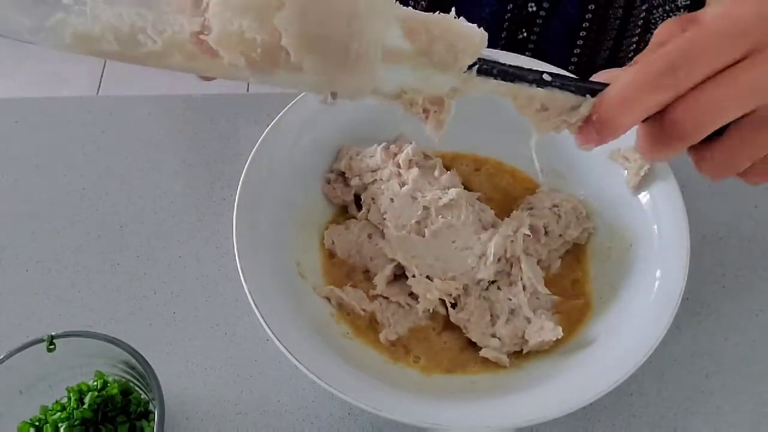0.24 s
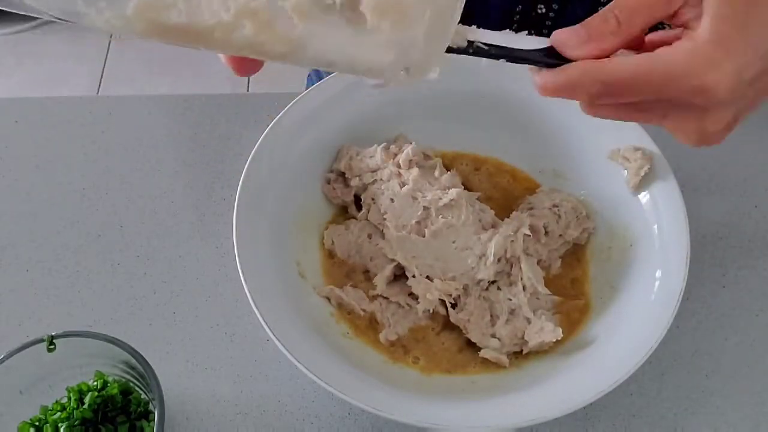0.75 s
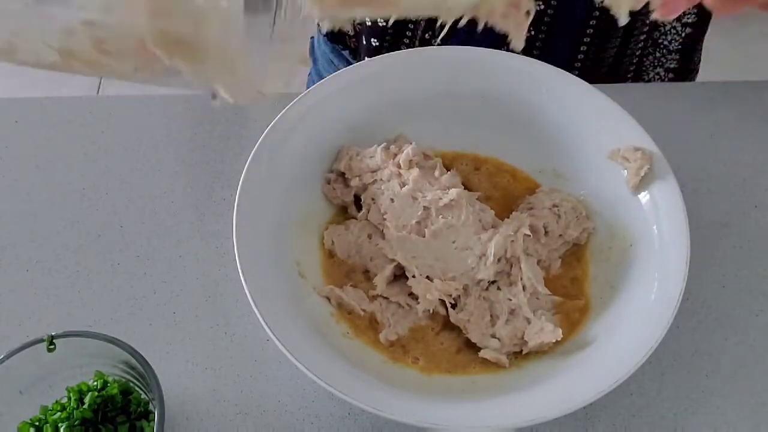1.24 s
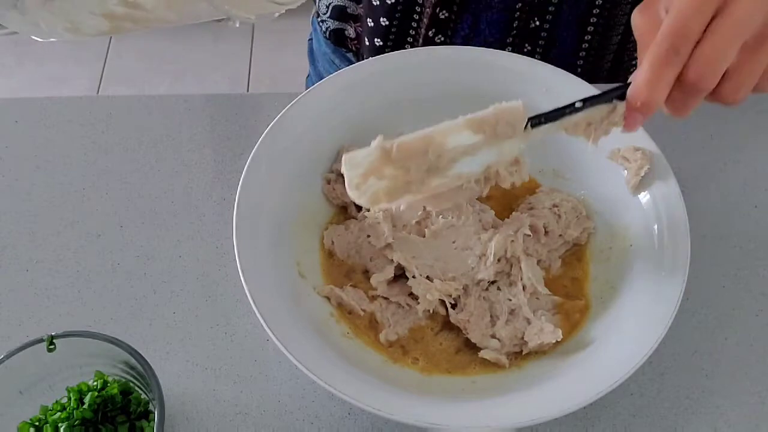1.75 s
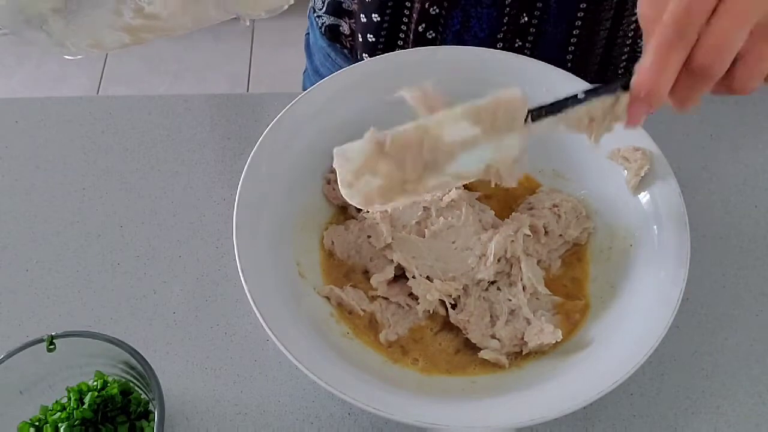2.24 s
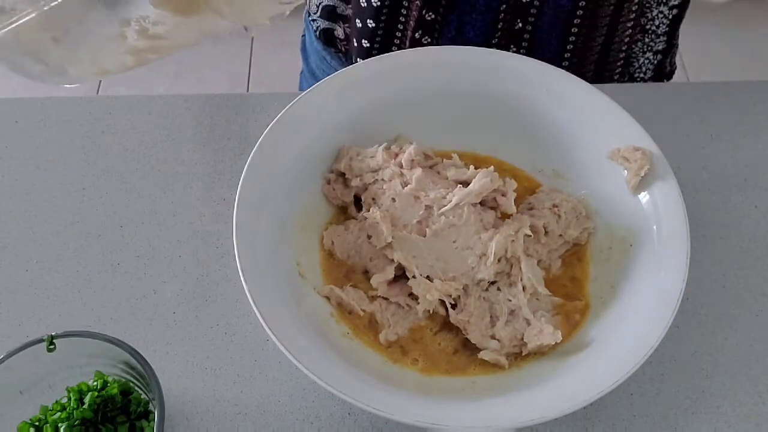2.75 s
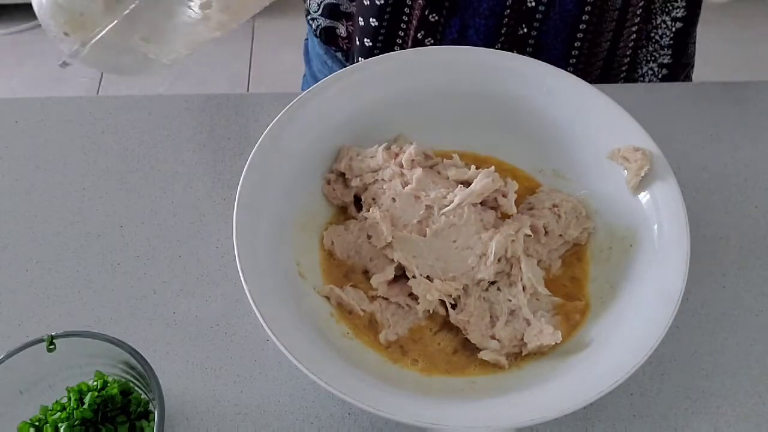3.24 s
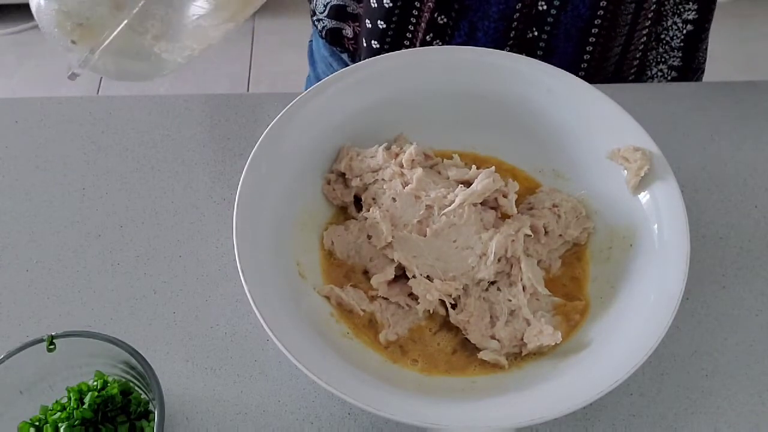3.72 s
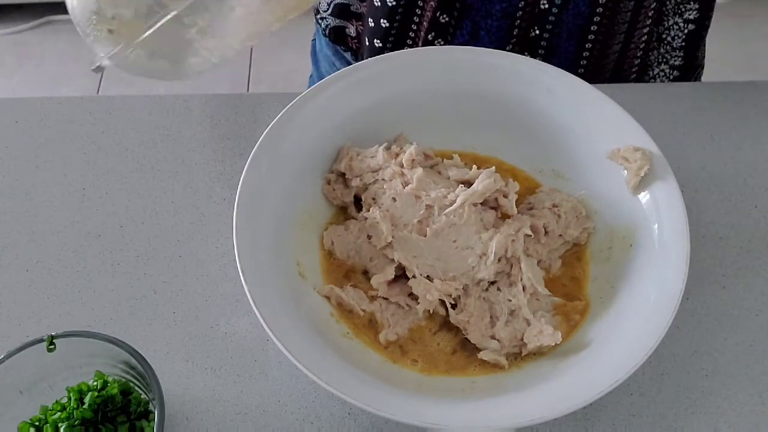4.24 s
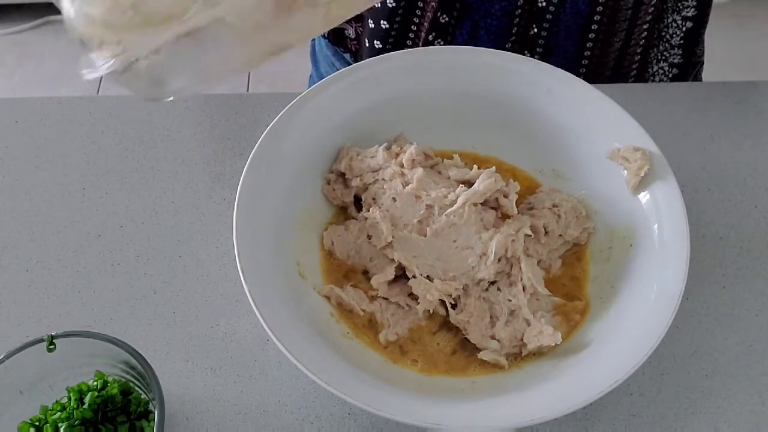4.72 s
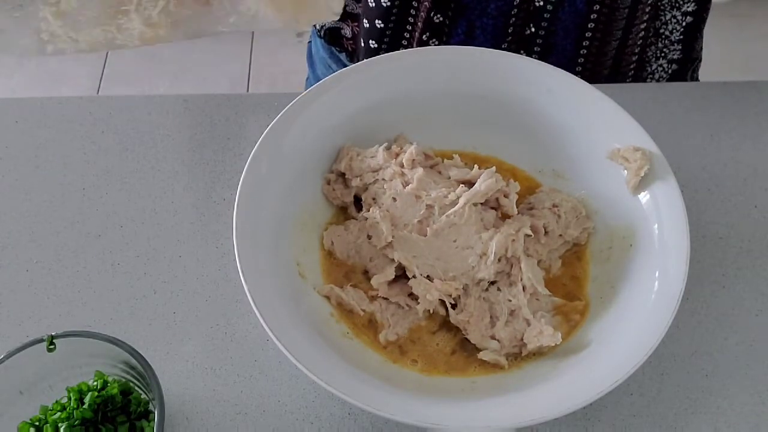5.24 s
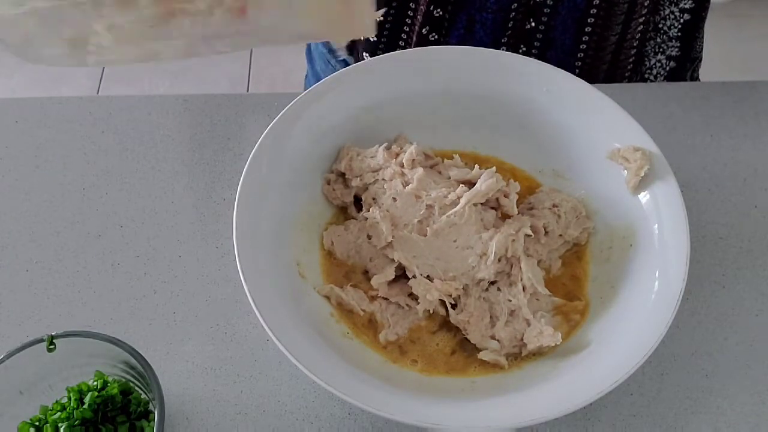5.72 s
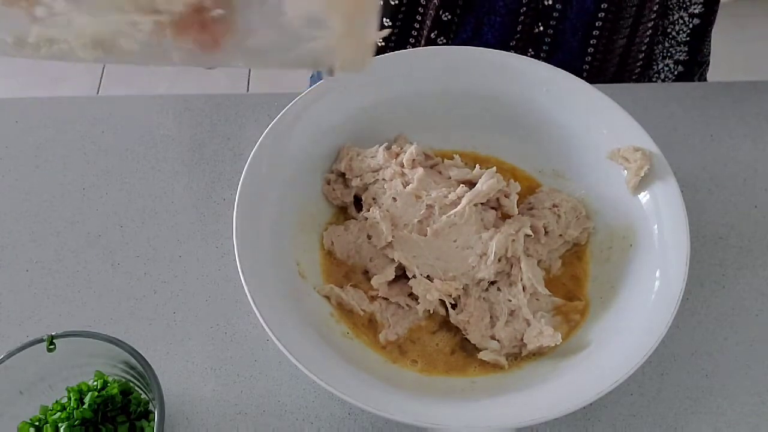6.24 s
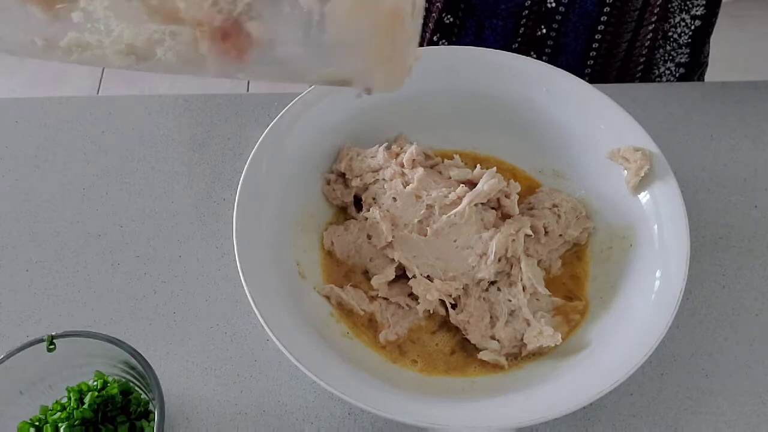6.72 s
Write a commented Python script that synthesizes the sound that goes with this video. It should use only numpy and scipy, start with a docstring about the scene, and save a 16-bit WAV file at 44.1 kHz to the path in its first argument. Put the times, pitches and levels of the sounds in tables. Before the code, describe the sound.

Wet, sticky scraping comes in clusters over a continuous wavering motor hum and soft air noise. A sharp knock on paste-coated glass lands early, another around 0.9 seconds with a dull thud. The middle is sparse, with faint squelches and a bright smacking cluster; then strokes, a strong knock and low bumps follow until the end. The stereo pickup is close, in a small room with a short, slightly hard reverberation.

```python
"""A refrigerator and a slower fan motor hum steadily: wavering harmonics over shaped noise.
A spatula scrapes thick paste out of a glass blender jug into a bowl, in a small kitchen.
Scraping is clumped pops and grains through resonances; smacks, knocks and sticky ticks are noise bursts.
Soft bumps thud through the counter as short decaying sines."""
import sys
import numpy as np
from scipy import signal
from scipy.fft import rfft, irfft
from scipy.io import wavfile

SR = 44100
rng = np.random.default_rng(int(sys.argv[2]) if len(sys.argv) > 2 else 0)


def master_out(mix):
    """Clip the mix to full scale and print it as 16-bit PCM to the path in sys.argv[1]."""
    frames = np.transpose(np.atleast_2d(mix))
    ceiling = np.clip(frames, -1, 1)
    pcm = np.round(ceiling * 32767).astype(np.int16)
    wavfile.write(sys.argv[1], SR, pcm)


N = 307377
TIME = np.arange(N) / SR

# refrigerator motor harmonics: multiple, level_db_rms, ear_phase_rad
FRIDGE_LINES = [(1, -47.2, 0), (2, -62.5, 0), (3, -63, -.1), (4, -61.5, -.3), (5, -69, -.4), (7, -63.5, .2),
                (11, -67.5, -.5), (13, -66.5, -.6), (14, -69, -1.4), (16, -77, -1.7), (19, -81, -2.0),
                (33, -82, 1.4), (45, -87, 1.8), (79, -86, 2.0)]
# fan motor harmonics: multiple, level_db_rms (before the lean to the right), ear_phase_rad
FAN_LINES = [(1, -50.2, -.05), (2, -62, -.1), (3, -63, 0), (4, -46.7, -.1), (5, -67, -.2), (6, -68, -.4),
             (7, -74, -.2), (8, -70, -.1), (11, -66, .1), (12, -65.5, 0)]
FRIDGE_HZ, FAN_HZ, MAINS_HZ = 59.185, 44.875, 60
# refrigerator whine: time_s, level_db
WHINE_LEVEL = [(0, -72), (1, -72.5), (1.6, -64.5), (2.4, -64), (3, -65), (3.3, -66.5), (3.7, -67),
               (4.5, -65), (5.3, -71), (6.3, -67.5), (6.97, -72.5)]
# drone at twice the mains rate, swelling near the end: time_s, level_db
DRONE_LEVEL = [(0, -58), (5.7, -74), (6.0, -57), (6.3, -48.5), (6.65, -49.5), (6.97, -58)]
# moving air: freq_hz, level_db_per_hz
AIR_SPECTRUM = [(25, -76), (42, -70), (70, -77.5), (105, -74.5), (145, -84), (178, -73), (215, -82.5),
                (330, -83.5), (520, -81.5), (800, -88), (1030, -98), (1270, -96), (1650, -103),
                (2000, -105)]
# faint hiss above the air: freq_hz, level_db_per_hz (before HISS_TRIM_DB)
HISS_SPECTRUM = [(2000, -106.4), (2500, -109.5), (4200, -111.5), (6700, -113), (7800, -108), (9000, -121),
                 (10200, -121), (12000, -118), (16000, -119)]
HISS_TRIM_DB = -1
# left-right likeness of the air: freq_hz, correlation
EAR_LIKENESS = [(60, 0.99), (170, 0.56), (300, 0.69), (500, 0.71), (800, 0.11), (1300, -0.35),
                (2500, -0.15), (16000, 0)]

# blade strokes through the paste: start_s, length_s, level_db, wet_crackle_db (against the level)
BLADE_STROKES = [(0.039, 0.062, -64.5, -2), (0.238, 0.17, -61.5, -11), (0.35, 0.41, -74.5, 3),
                 (0.742, 0.21, -62, -4), (.95, 0.2, -69.5, -13), (2.018, 0.13, -75, 0),
                 (2.261, 0.092, -61, 0), (3.322, 0.14, -62.5, -2.5), (3.388, 0.034, -53.5, 4),
                 (4.118, 0.1, -59, -7), (4.411, 0.1, -58.5, -8), (4.503, 0.21, -62, -12),
                 (4.772, 0.19, -66.5, -4), (5.102, 0.1, -65.5, -12), (5.412, 0.037, -64.5, -6),
                 (5.514, 0.021, -57, -14), (5.636, 0.1, -65.5, -6), (5.784, 0.074, -62, -19),
                 (5.872, .1, -62.5, -6), (6.118, 0.047, -64, -4.5), (6.26, 0.053, -65.5, 6.5),
                 (6.35, 0.044, -74, 3), (6.467, .1, -67, 2), (6.568, 0.17, -71, 5.5),
                 (6.862, 0.1, -75, -12)]
STROKE_ATTACK_S, STROKE_RELEASE_S = 0.011, 0.018
# blade presses hard on the wall and judders: start_s, length_s, level_db
BLADE_PRESSES = [(.28, 0.056, -62), (.51, 0.023, -55), (.75, 0.048, -59), (.86, 0.031, -48),
                 (4.145, 0.059, -51.5), (4.42, 0.055, -50), (4.57, 0.048, -71), (5.52, 0.041, -59),
                 (5.79, 0.097, -68), (6.14, 0.032, -64), (6.25, 0.036, -61), (6.45, 0.037, -81)]
PRESS_ATTACK_S, PRESS_RELEASE_S = 0.029, 0.019
# colour of the wipe: freq_hz, relative_db_per_hz
WIPE_SPECTRUM = [(900, -20), (1300, 5), (2300, -7.5), (3500, -1), (5500, -1), (7500, -2.5), (9000, -11),
                 (16000, -11)]
# colour of the wet crackle: freq_hz, relative_db_per_hz
CRACKLE_SPECTRUM = [(1500, -2), (3500, 12), (6000, -8), (7800, 8), (9200, -1.5), (12000, 6), (16000, 5)]
# modes set ringing by rubbing, air column first: freq_hz, relative_db, t60_s
RUB_MODES = [(520, 2.5, 0.23), (1240, -14, 0.11), (1407, -6, 0.01), (1968, -13.5, 0.084),
             (2357, -7.5, 0.022), (3430, -28, 0.016)]
# modes of the paste-damped jug: freq_hz, gain_db, t60_s
JUG_MODES = [(522, 0, 0.04), (1120, 17, 0.059), (1740, -17, 0.036), (1990, 5, 0.081), (2393, -3.5, 0.025),
             (2730, 6, 0.12), (3010, -7.5, 0.025), (3253, -7, 0.081), (4050, -11.5, 0.036),
             (4880, -8, 0.12), (4930, -18, .07), (5700, 0, 0.058), (5860, -5, 0.15), (6600, -32, .05),
             (7500, -5, 0.02), (7720, -27, 0.038)]
# sticky ticks: rate at full stroke, and how long they take to thin out after it
TICKS_PER_S, TICK_LINGER_S = 26, .12

# paste lets go with a wet smack: start_s, level_db, fizz_db (against the level, before the common fizz gain)
PASTE_SMACKS = [(0.18, -54.5, -8), (0.526, -73, -2), (0.717, -49.5, -6), (0.739, -44, -9),
                (0.7645, -52, -17), (0.914, -47, -7), (0.9975, -57, -5), (1.02, -72.5, 14),
                (1.062, -67.5, -3), (1.124, -68, -16), (1.5768, -74, 5), (1.758, -67, 0),
                (2.0393, -63.5, 3), (2.0515, -67, 9), (2.145, -65, 5), (2.2996, -56, -3),
                (3.2128, -65.5, 1), (3.3513, -50.5, -11), (3.382, -48.5, 0), (3.3976, -41.5, -5),
                (3.411, -42, -2), (3.4333, -49, -14), (3.5053, -62, -4), (4.127, -48.5, -10),
                (4.1476, -52.5, -6), (4.308, -63.5, 3), (4.439, -55.5, -11), (4.4707, -58.5, -5),
                (5.0945, -60, -10), (5.434, -54, -6.5), (5.6587, -53, -11), (5.664, -46.5, -3),
                (5.7195, -75, -13), (5.8093, -65, -18), (6.372, -61, -8), (6.5148, -55.5, -4),
                (6.588, -50.5, -7), (6.635, -58, -4)]
# a stronger smack is thinner: dB of lows lost per dB over the usual level
USUAL_SMACK_DB, SMACK_THINNING = -53.5, .35
# spatula on jug: start_s, level_db, dullness_db, contact_hz, contact_db (against the level,
# before the common contact gain), rise_s
JUG_KNOCKS = [(0.3331, -28.5, -9, 5400, -16.5, 0.0013), (0.882, -40, -3, 6920, 2.5, 0.003),
              (4.202, -68.5, 19, 2460, 3, 0.00089), (4.5448, -30.5, -13.5, 2030, -9.5, 0.0033),
              (4.612, -71, 9, 2340, 11, 0.0016), (4.8306, -41, -8.5, 5850, -19, 0.0014),
              (5.2926, -47, -6.5, 5870, -18, 0.0025), (5.3526, -53.5, -7, 2530, -4.5, 0.00069),
              (5.557, -43.5, -3.5, 5900, -5, 0.001), (5.8398, -51.5, -12, 5570, -12, 0.0013),
              (5.887, -58.5, 11, 2340, -1.5, 0.002), (6.1543, -62, 6, 1740, -5, 0.0018),
              (6.256, -51, 5.5, 2780, -6.5, 0.00052), (6.2805, -62, -14, 1910, 8, 0.00086),
              (6.4615, -59.5, 5, 5020, -5.5, .0012), (6.8514, -50.5, -1, 1776, -1.5, 0.0014)]
KNOCK_T60_S = 0.032
DULL_INTO_RING = 0.47  # share of a knock's dullness that also lifts the wall's middle range
# soft bumps through the counter: start_s, peak_db, pitch_hz, t60_s
COUNTER_THUDS = [(0.912, -29.5, 96, 0.065), (4.189, -46, 90, 0.067), (5.349, -38, 84.5, 0.037),
                 (5.561, -29.5, 97, 0.028), (5.842, -27.5, 82.4, 0.081), (6.151, -21.5, 107, 0.086),
                 (6.274, -34, 99, 0.065), (6.486, -33, 119, 0.099)]
CUTOFF_HZ = 16000


def from_db(db):
    """Decibels to gain."""
    return 10 ** (np.asarray(db) / 20)


def rms_one(x):
    """Scale to unit power."""
    return x / np.sqrt(np.mean(x ** 2) + 1e-20)


def decay(t, t60_s):
    """Exponential fall of 60 dB in t60_s."""
    return np.exp(-np.log(1000) * t / t60_s)


def gain_curve(rows):
    """Rows of time_s, level_db as gain in time, silent outside the rows."""
    rows = np.array(rows)
    return from_db(np.interp(TIME, rows[:, 0], rows[:, 1], left=-140, right=-140))


def at_hz(points, hz):
    """Read a table on a log-frequency axis."""
    points = np.array(points)
    return np.interp(np.log(hz + 1e-9), np.log(points[:, 0]), points[:, 1])


def colour(x, spectrum):
    """Shape a steady sound by a spectrum."""
    hz = np.linspace(0, SR / 2, 2 ** 18 + 1)
    shaped = rfft(x, 2 ** 19) * from_db(at_hz(spectrum, hz))
    return irfft(shaped)[..., :N]


def band(x, low_hz, high_hz, order=2):
    """Causal band-pass."""
    edges_hz = [low_hz, min(high_hz, .45 * SR)]
    return signal.sosfilt(signal.butter(order, edges_hz, "band", fs=SR, output="sos"), x + 1e-18)


def drift(rate_hz):
    """Slow chance: straight lines between random knots of spread 1."""
    knots = rng.standard_normal(N // 40)
    return np.interp(TIME * rate_hz, np.arange(len(knots)), knots)


def resonance(x, hz, t60_s):
    """One mode with gain 1 on its top."""
    r = np.exp(-np.log(1000) / (t60_s * SR))
    feed = np.array([1, 0, -1]) * (1 - r * r) / 2
    return signal.lfilter(feed, [1, -2 * r * np.cos(2 * np.pi * hz / SR), r * r], x + 1e-18)


def add(out, start_s, sound):
    """Mix a sound in at start_s."""
    start = max(round(start_s * SR), 0)
    out[:, start:start + sound.shape[-1]] += sound[..., :N - start]


def tone(hz, ear_phase_rad):
    """A motor line of about unit power that wavers slightly in pitch and level."""
    phase = 2 * np.pi * (hz * TIME + rng.random()) + .07 * drift(5)
    ears = ear_phase_rad * np.array([[.5], [-.5]])
    return np.sqrt(2) * from_db(.5 * drift(7)) * np.sin(phase + ears)


def hum():
    """Two motors beat against each other, under a thin whine and a mains drone."""
    fridge = sum(from_db(db) * tone(round(k) * FRIDGE_HZ, ears) for k, db, ears in FRIDGE_LINES)
    fan = 0
    for k, db, ears in FAN_LINES:
        # the fan stands to the right; its longest waves reach both ears alike
        lean_db = np.array([[-1], [1]]) * (k > 2.5)
        fan = fan + from_db(db + lean_db) * tone(round(k) * FAN_HZ, ears)
    whine = gain_curve(WHINE_LEVEL) * tone(21 * FRIDGE_HZ, -np.pi / 2)
    drone = gain_curve(DRONE_LEVEL) * tone(2 * MAINS_HZ, 0)
    return fridge + fan + whine + drone


def air(ripple_db=3.0):
    """Moving air and faint hiss: mid and side noise, rippled by reflections, most alike in the bass."""
    hz = np.geomspace(20, SR / 2, num=900)
    level_db = at_hz(list(AIR_SPECTRUM) + list(HISS_SPECTRUM), hz)
    level_db = level_db + HISS_TRIM_DB * (hz > HISS_SPECTRUM[0][0])
    ripples_db = ripple_db * rng.standard_normal((2, len(hz))) * (hz > 250)
    alike = np.clip(at_hz(EAR_LIKENESS, hz), -.995, .995)
    side_db = level_db + 10 * np.log10((1 - alike) / (1 + alike))
    mid, side = np.sqrt(SR / 2) * rng.standard_normal((2, N))
    mid = colour(mid, np.c_[hz, level_db + ripples_db[0]])
    side = colour(side, np.c_[hz, side_db + ripples_db[1]])
    return mid + side * [[1], [-1]]


def gestures(rows, attack_s, release_s):
    """Gain in time for rows of start_s, length_s, level_db: each swells, holds and dies away."""
    power = np.zeros(N)
    for start_s, length_s, db in rows:
        swell = np.clip((TIME - start_s) / attack_s, 0, 1)
        fade = np.exp(-np.clip((TIME - start_s - length_s) / release_s, 0, 20))
        power += (from_db(db) * swell * fade) ** 2
    return np.sqrt(power)


def squelch(low_hz, high_hz, cycles, clump_db, sizes=11, pops_per_s=1100):
    """Tiny pockets in the paste pop in clumps, each pocket size ringing briefly at its own pitch."""
    clumps, out = drift(90), 0
    for hz in np.geomspace(low_hz, high_hz, sizes):
        born = np.flatnonzero(rng.random(N) < pops_per_s / SR)
        swell = (clumps + drift(120))[born].clip(-2.5, 2.5)
        pops = np.zeros((2, N))
        pops[:, born] = rng.standard_normal((2, len(born))) * from_db(clump_db * swell)
        out = out + np.sqrt(hz) * rms_one(resonance(pops, hz, cycles / hz))
    return out


def grains(per_s, spread_db):
    """Random tiny clicks of uneven size that come in clumps."""
    born = rng.random(N) < per_s * from_db(4 * drift(60)) / SR
    sizes = born * from_db(spread_db * np.minimum(rng.exponential(1, N), 4))
    return sizes * rng.standard_normal((2, N))


def jug(x):
    """The wall and its air column ring briefly under their coat of paste."""
    return sum(from_db(db) * resonance(x, hz, t60_s) for hz, db, t60_s in JUG_MODES)


def scraping(wipe_db=-3, ringing_db=-6, crackle_db=0, rub_db=-1, light_rub_db=-12):
    """The blade sticks and slips on the glass, the paste crackles behind it and the jug resounds."""
    stroke_rows = [(s, length_s, db) for s, length_s, db, wet_db in BLADE_STROKES]
    wet_rows = [(s, length_s, db + wet_db) for s, length_s, db, wet_db in BLADE_STROKES]
    motion = gestures(stroke_rows, STROKE_ATTACK_S, STROKE_RELEASE_S)
    parting = gestures(wet_rows, STROKE_ATTACK_S, STROKE_RELEASE_S)
    pressure = gestures(BLADE_PRESSES, PRESS_ATTACK_S, PRESS_RELEASE_S)
    pressure = pressure + from_db(light_rub_db) * motion

    sticking = squelch(1900, 8000, cycles=40, clump_db=3.8)
    friction = rms_one(colour(sticking, WIPE_SPECTRUM))
    ringing = rms_one(jug(friction))
    wipe = (from_db(wipe_db) * friction + from_db(ringing_db) * ringing) * motion

    bubbles = squelch(4500, 15000, cycles=30, clump_db=3.8)
    crackle = rms_one(colour(bubbles, CRACKLE_SPECTRUM)) * parting

    judder = band(grains(per_s=600, spread_db=2.5), 400, 4000)
    rub = sum(from_db(db) * rms_one(resonance(judder, hz, t60_s)) for hz, db, t60_s in RUB_MODES)
    return wipe + from_db(crackle_db) * crackle + from_db(rub_db) * rub * pressure


def slips(rise_s, t60_s, grain_db, size=4400):
    """A cluster of tiny slips that builds up and dies, scattered differently to each ear."""
    t = np.arange(size) / SR
    steps = np.repeat(rng.standard_normal(size // 40), 40).clip(-2, 2)
    build = (1 - np.exp(-t / max(rise_s, 1e-4))) ** 2
    shape = build * decay(t, max(t60_s, .004))
    return rng.standard_normal((2, size)) * from_db(grain_db * steps) * shape


def voiced(x, zones):
    """Share a burst among zones of low_hz, high_hz, level_db."""
    return sum(from_db(db) * rms_one(band(x, low_hz, high_hz, order=3)) for low_hz, high_hz, db in zones)


def ticks(low_db=-89, bright_db=-82, fizz_db=-82, spread_db=3):
    """Threads of paste snap at random during a stroke, then fewer and fainter after it."""
    rows = [(s, length_s, 0) for s, length_s, db, wet_db in BLADE_STROKES]
    busy = np.minimum(gestures(rows, STROKE_ATTACK_S, TICK_LINGER_S), 1)
    born = rng.random((1, N)) < TICKS_PER_S * busy / SR
    clicks = born * busy * from_db(spread_db * rng.standard_normal(N).clip(-2, 2))
    snap = slips(rise_s=.0004, t60_s=.016, grain_db=4)
    snap = voiced(snap, [(1800, 4900, low_db), (5300, 6800, bright_db), (10700, 17400, fizz_db)])
    return signal.fftconvolve(clicks, snap, axes=1)[:, :N]


def smacks(low_db=-17, bright_db=-10, fizz_db=-10, pop_db=-15, pop_hz=7700, rise_s=0.0011):
    """Films and air pockets in the paste burst, high and short."""
    out = np.zeros((2, N))
    for start_s, level_db, own_fizz_db in PASTE_SMACKS:
        thinned_db = low_db - SMACK_THINNING * (level_db - USUAL_SMACK_DB)
        zones = [(1720, 5700, thinned_db), (5550, 7980, bright_db), (10400, 14600, own_fizz_db + fizz_db)]
        tearing = slips(rise_s, t60_s=.036, grain_db=4)
        pop = from_db(pop_db) * rms_one(resonance(tearing, pop_hz, t60_s=0.012))
        add(out, start_s, from_db(level_db) * (voiced(tearing, zones) + pop))
    return out


def knocks(body_db=-8, hollow_db=-16.5, ring_db=-9, crack_db=-11, edge_db=-13, fizz_db=-21.0,
           contact_db=-3, modes_db=-4, contact_cycles=40):
    """The blade cracks on the wall, duller where paste cushions it, pitched by where it lands."""
    hits = np.zeros((2, N))
    blade = [(4600, 6700, crack_db), (7100, 7880, edge_db), (8700, 13000, fizz_db)]
    for start_s, level_db, dull_db, hz, pitched_db, rise_s in JUG_KNOCKS:
        force = slips(rise_s, KNOCK_T60_S, grain_db=3.5)
        lift_db = DULL_INTO_RING * dull_db
        wall = [(260, 677, dull_db + body_db),
                (1356, 1900, (dull_db + lift_db) / 2 + hollow_db),
                (2150, 4070, lift_db + ring_db)]
        contact = rms_one(resonance(force, hz, contact_cycles / hz))
        contact = from_db(pitched_db + contact_db) * contact
        add(hits, start_s, from_db(level_db) * (voiced(force, wall + blade) + contact))
    return hits + from_db(modes_db) * jug(hits)


def thuds(rise_s=0.0053):
    """A soft push swings the counter for a few cycles."""
    out, t = np.zeros((2, N)), np.arange(SR // 4) / SR
    for start_s, peak_db, hz, t60_s in COUNTER_THUDS:
        swing = (1 - np.exp(-(t / rise_s) ** 2)) * decay(t, t60_s)
        add(out, start_s, -from_db(peak_db) * swing / swing.max() * np.sin(2 * np.pi * hz * t))
    return out


def kitchen(x, early_db=-11, early_t60_s=0.088, late_db=-20, late_t60_s=.55):
    """Quick reflections from counter and bowl, then the duller tail of a tiled room."""
    t = np.arange(SR * 2 // 3) / SR
    response = 0
    for db, t60_s, top_hz in (early_db, early_t60_s, 11000), (late_db, late_t60_s, 5600):
        noise = rng.standard_normal((2, len(t))) * (t > .004) * decay(t, t60_s)
        echoes = band(noise, 155, top_hz, order=4)
        response = response + from_db(db) * rms_one(echoes) / np.sqrt(len(t))
    return signal.fftconvolve(x, response, axes=1)[:, :N]


def scene():
    """The work happens slightly to the right, over the hum of the room."""
    paste = (scraping() + ticks() + smacks()) * from_db([[-1.3], [1.3]])
    work = paste + knocks() * from_db([[-.9], [.9]])
    return hum() + air() + work + kitchen(work) + thuds()


def record(dry):
    """The top is cut steeply."""
    return signal.sosfilt(signal.ellip(10, .2, 80, CUTOFF_HZ, fs=SR, output="sos"), dry)


dry = scene()
out = record(dry)
master_out(out)
```